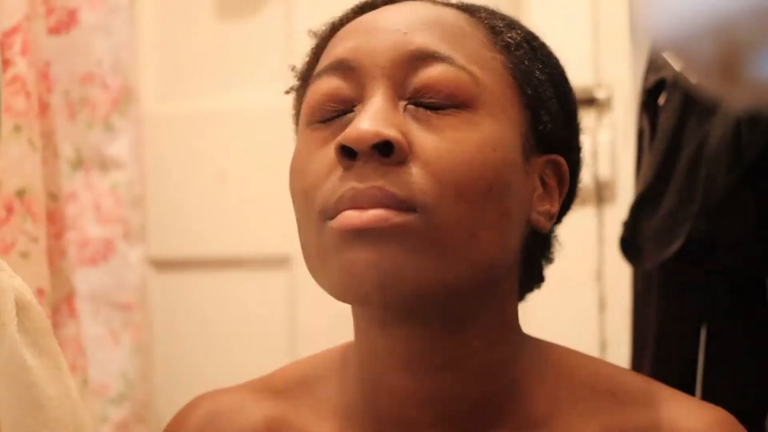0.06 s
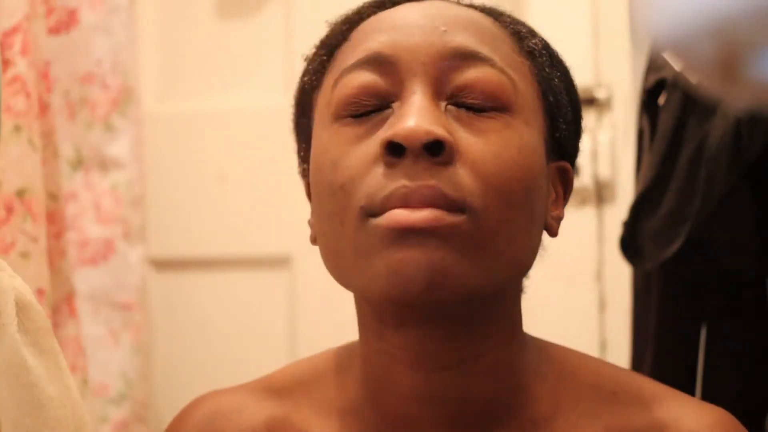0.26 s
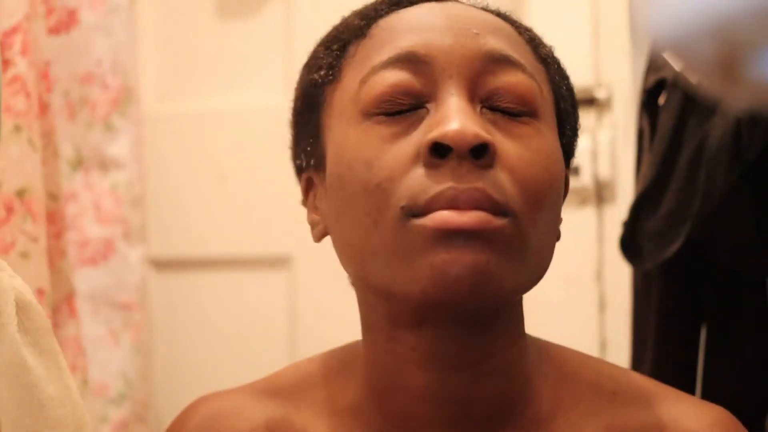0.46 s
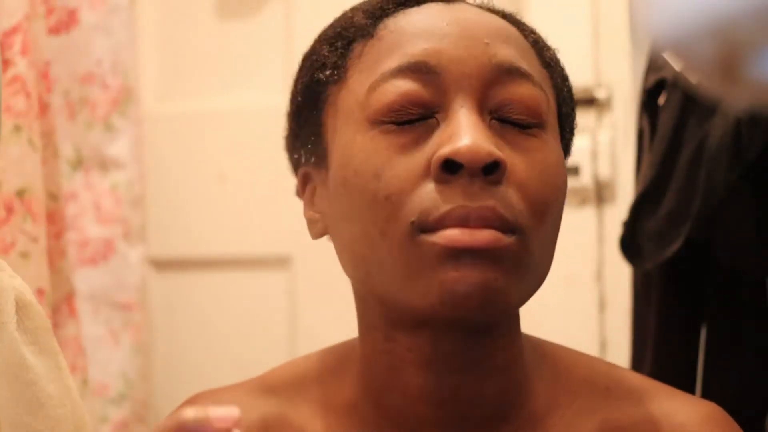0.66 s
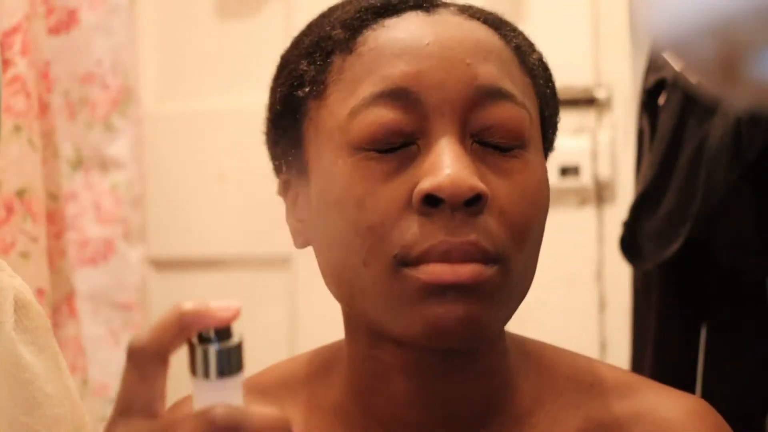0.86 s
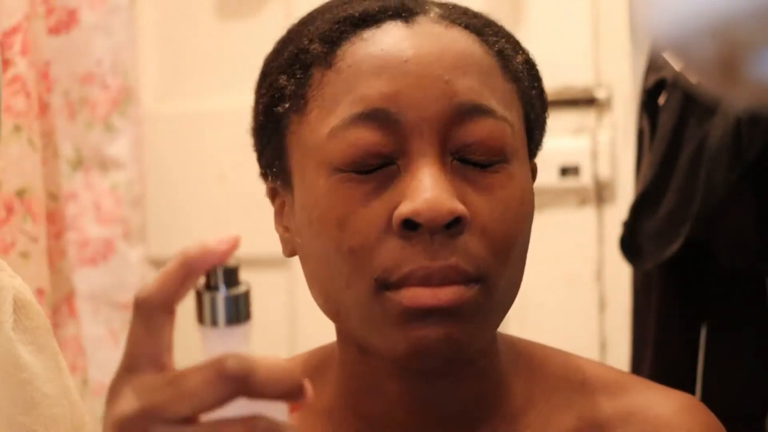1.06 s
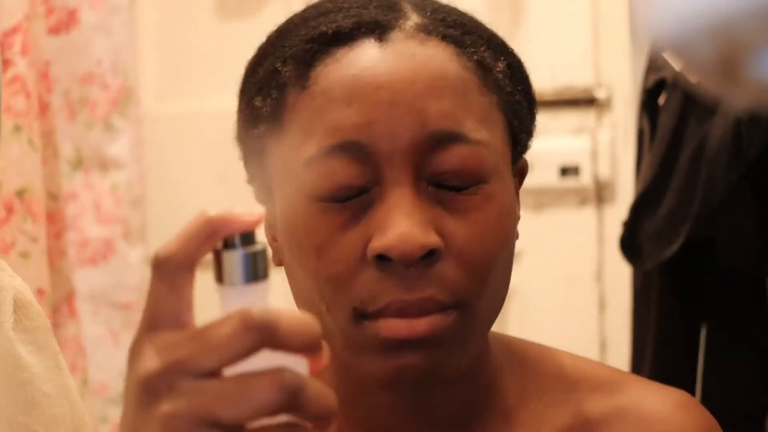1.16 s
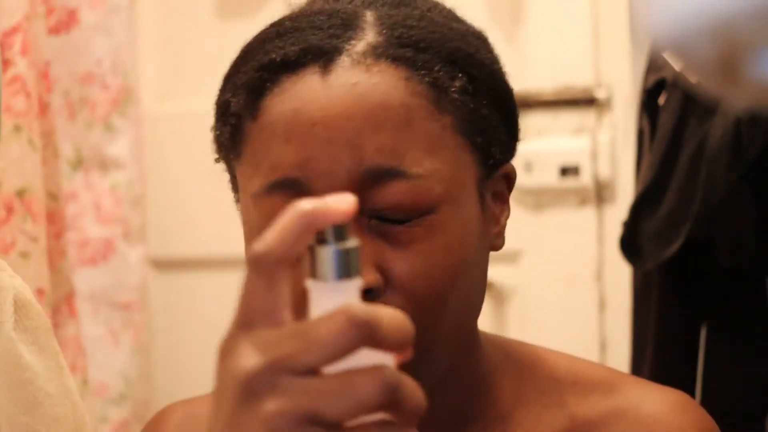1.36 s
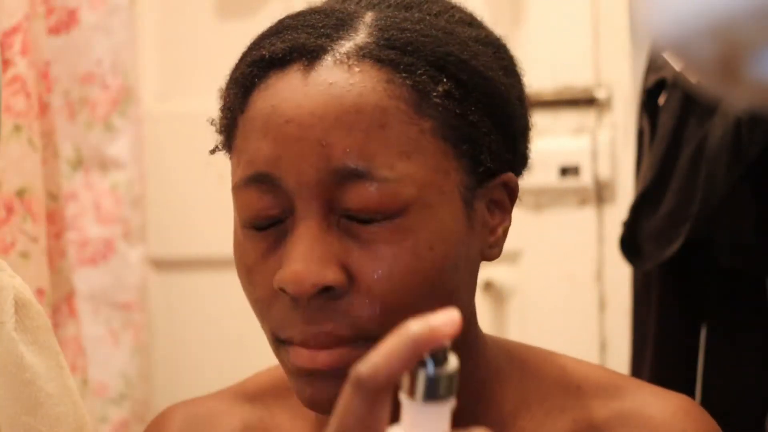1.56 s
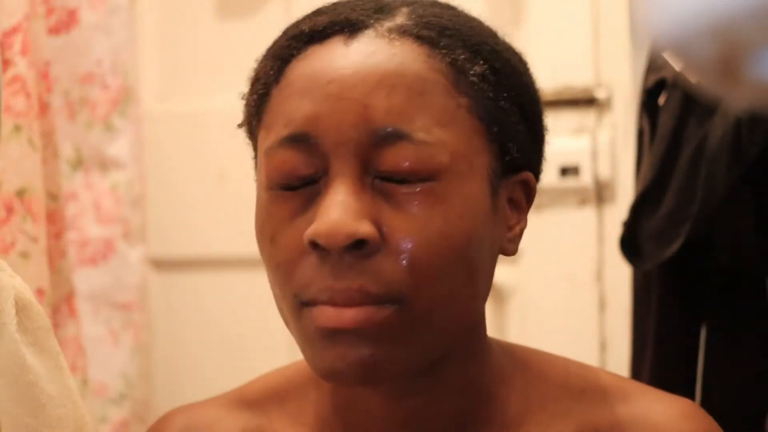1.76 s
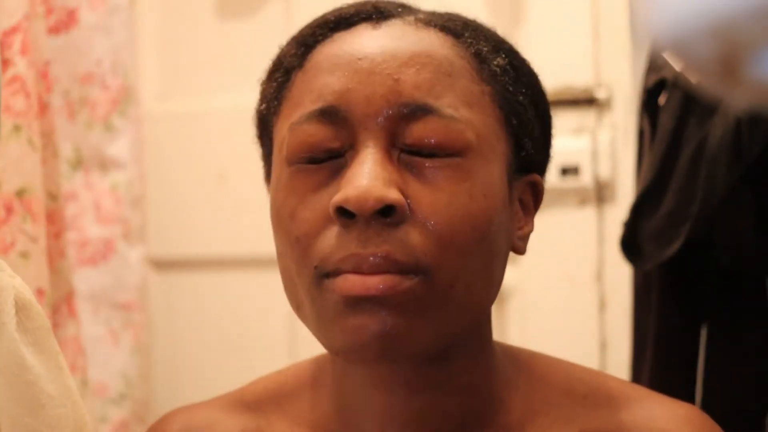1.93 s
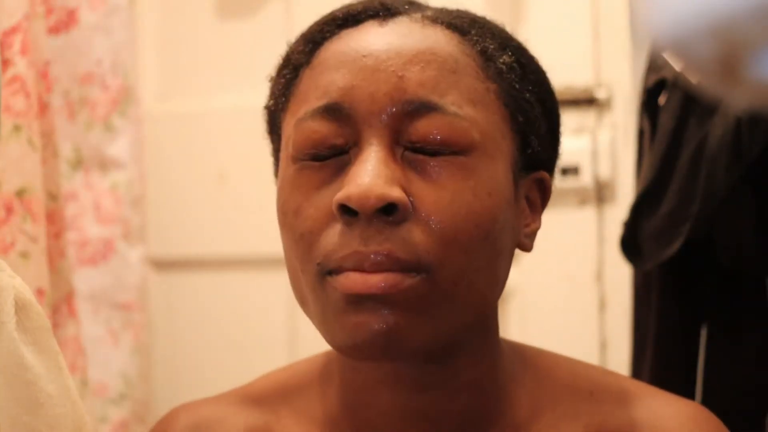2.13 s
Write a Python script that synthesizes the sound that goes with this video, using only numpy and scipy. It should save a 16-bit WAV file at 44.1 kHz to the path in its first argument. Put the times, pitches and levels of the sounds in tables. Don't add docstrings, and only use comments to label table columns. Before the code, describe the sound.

Close up in a small reflective bathroom, a finger works a mist sprayer: creaky plastic rub, crisp short hiss, head knocking back, thin sucking whistle, repeated about four times a second over quiet room air.

```python
import sys
import numpy as np
from scipy import signal
from scipy.fft import rfft, irfft
from scipy.io import wavfile
from scipy.ndimage import uniform_filter1d

SR = 44100
rng = np.random.default_rng(int(sys.argv[2]) if len(sys.argv) > 2 else 0)


def transcribe(signal):
    frames = np.atleast_2d(signal).T
    limited = np.clip(frames, -1, 1)
    pcm = np.round(limited * 32767).astype(np.int16)
    wavfile.write(sys.argv[1], SR, pcm)


def attenuation_scalar(level_db):
    decades = np.asarray(level_db, float) / 20
    return 10 ** decades


N = 96755

OPENS = [
    .0778,
    .3995,
    .6492,
    .9202,
    1.1986,
    1.4665,
    1.725,
    1.9888,
    2.185,
]


def time():
    return np.arange(N) / SR


def rms_one(x):
    return x / np.sqrt(np.mean(x ** 2) + 1e-20)


def cut(x, hz, kind):
    return signal.sosfilt(signal.butter(2, hz, kind, fs=SR, output="sos"), x)


def band(x, hz, width):
    return rms_one(cut(x, [hz - width / 2, hz + width / 2], "band"))


def colour(x, points):
    hz, db = np.transpose(points)
    f = np.arange(N // 2 + 1) * SR / N + 1
    gain = attenuation_scalar(np.interp(np.log(f), np.log(hz), db))
    return rms_one(irfft(rfft(x) * gain, N))


def drift(rate):
    r = np.exp(-2 * np.pi * rate / SR)
    settle = 9000
    slow = signal.lfilter([1], [1, -2 * r, r * r], rng.standard_normal(N + settle))
    return rms_one(slow[settle:])


def ring(clicks, hz, t60):
    r = attenuation_scalar(-60 / (t60 * SR))
    w = 2 * np.pi * hz / SR
    return signal.lfilter([0, np.sin(w)], [1, -2 * r * np.cos(w), r * r], clicks + 1e-18)


def burst(s, rise, fall):
    out = np.zeros(N)
    i, j = max(int((s - rise) * SR), 0), int((s + 9 * fall) * SR)
    t = time()[i:j] - s
    out[i:j] = np.where(t < 0, np.clip(1 + t / rise, 0, 1), np.exp(-np.maximum(t, 0) / fall))
    return out


def grains(per_s, spread):
    size = attenuation_scalar(spread * np.minimum(rng.exponential(1, N), 4)) * rng.choice([-1, 1], N)
    return rms_one(size * (rng.random(N) < per_s / SR))


def jet():
    # length in s, hiss in dB, pop peak in dB, swell after opening in dB, sag in dB per s.
    sprays = [
        (0.13, -41.5, -43, 2, -3),
        (0.099, -43, -41, 5.5, 23),
        (0.13, -42, -30.5, 4.5, 27),
        (0.12, -41.5, -28, 7, 39),
        (0.13, -40.5, -29, 5, 39),
        (0.1, -42, -28, 6.5, 35),
        (0.099, -42, -26, 6.5, 34),
        (0.072, -42.5, -32, 7.5, 25),
        (.1, -50, -55, 21, 30),
    ]
    # frequency in Hz, level in dB per Hz.
    mist_spectrum = [(710, -16), (1200, -12.5), (2980, 0.5), (3290, -2), (8000, -3), (9230, -5.5),
                     (14900, -5), (16000, 0.5), (16500, -71)]
    # frequency in Hz, width in Hz, level in dB.
    nozzle = [(6160, 2000, -9.5), (8630, 2200, -4.5)]
    # frequency in Hz, level in dB.
    pop_rings = [(1700, -9.5), (3500, -43), (6000, 2), (9400, 3), (12000, -13), (15500, -14)]
    attack_s, swell_s, release_db_per_s = 0.00072, 0.038, 419
    surge_db, surge_s = 3, 0.012
    alike = 0.18

    level, start, pops = np.zeros((3, N))
    for s, (length, db, pop_db, swell_db, sag_db) in zip(OPENS, sprays):
        t = time() - s
        swell = swell_db * np.clip(t / swell_s, 0, 1) + surge_db * np.exp(-np.abs(t) / surge_s)
        fall = sag_db * t + release_db_per_s * np.maximum(t - length, 0)
        level += np.clip(t / attack_s, 0, 1) * attenuation_scalar(np.minimum(db + swell - fall, 0))
        start += attenuation_scalar(db) * burst(s + attack_s, attack_s, 0.035)
        pops[int(s * SR)] = attenuation_scalar(pop_db)

    white = rng.standard_normal((3, N))
    flicker = attenuation_scalar(1.17 * drift(37))
    hiss = []
    for w in white:
        whistle = sum(attenuation_scalar(db) * band(w, hz, width) for hz, width, db in nozzle)
        hiss.append(level * colour(w, mist_spectrum) + start * whistle)
    hiss = signal.sosfilt(signal.cheby2(12, 40, 15950, fs=SR, output="sos"), np.array(hiss))

    top = cut(hiss, 10600, "high")
    unformed = sum(burst(s, attack_s, 0.035) for s in OPENS)
    hiss = (hiss - top * (1 - attenuation_scalar(-2.5)) * unformed) * flicker

    pop = sum(attenuation_scalar(db) * ring(pops, hz, 0.0037) for hz, db in pop_rings)
    near = np.sqrt(alike) * hiss[0] + cut(pop, 900, "high")
    return near, np.sqrt(1 - alike) * hiss[1:]


def bottle():
    # hardest rub in s, level in dB, rise in s, fall in s, hollow thud in dB.
    rubs = [
        (0.113, -44, 0.022, 0.055, -0.5),
        (0.398, -34, 0.0011, 0.012, -2),
        (0.69, -38, 0.039, 0.025, 1.5),
        (0.959, -38.5, 0.032, 0.059, -3.5),
        (1.237, -37, 0.031, 0.031, -1.5),
        (1.503, -39, 0.032, 0.032, 3.5),
        (1.763, -36.5, 0.035, 0.036, -6.5),
        (2.032, -39, 0.031, 0.038, 2),
        (2.2, -43, 0.018, 0.051, -4),
    ]
    # time in s, level in dB, ringing-on in s.
    knocks = [(0.237, -42, 0.029), (.248, -46, 0.055), (0.529, -38.5, 0.022), (0.774, -46.5, 0.027),
              (0.798, -41, 0.018), (1.078, -37.5, 0.02), (1.1, -56, 0.012), (1.356, -37, 0.0061),
              (1.363, -45, .012), (1.386, -62, 0.011), (1.615, -39.5, 0.0082), (1.621, -43.5, 0.0086),
              (1.886, -39.5, 0.012), (1.912, -45.5, 0.018), (1.942, -57, 0.014), (1.968, -75, 0.008),
              (2.134, -40, 0.0056), (2.148, -50.5, 0.0093)]
    # time in s, peak in dB.
    catch_times = [(0.0953, -31.5), (0.1031, -28.5), (0.1116, -25), (0.245, -32), (0.3986, -32),
                   (0.405, -26), (0.5302, -32), (.659, -44), (0.6785, -31), (0.6961, -29), (0.9343, -29),
                   (0.9437, -24), (0.955, -26.5), (0.959, -23), (1.212, -27.5), (1.2234, -35),
                   (1.236, -27.5), (1.25, -24), (1.258, -23), (1.479, -29), (1.489, -34), (1.497, -21.5),
                   (1.5032, -26.5), (1.508, -35.5), (1.522, -30), (1.737, -27.5), (1.747, -28),
                   (1.759, -22), (1.764, -37), (1.779, -45), (1.887, -37), (2.0011, -27), (2.009, -26.5),
                   (2.02, -26), (2.0367, -23)]
    # mode in Hz, t60 in s, level rubbed in dB, level knocked in dB.
    modes = [(248, 0.041, -29, -22), (328, 0.14, -8, -7), (372, 0.051, -10, -7.5),
             (410.8, 0.037, -4.5, -6.5), (462, 0.019, -11.5, -13), (546, 0.024, -10.5, -18.5),
             (736, 0.005, -16, -7.5), (909, 0.01, -7, -8.5), (1089, 0.017, -11.5, -8),
             (1506, 0.017, -12, -11), (1874, 0.0067, -13, -11), (2051, 0.011, 1, -19),
             (2558, 0.0094, 0.5, -15), (2885, 0.023, -4, -12.5)]
    low_top_hz, low_lead_cycles = 600, 2.9
    knock_late_s, knock_rise_cycles = 0.0015, 6.5

    slips, rattle = grains(1800, 2.5), grains(1500, 3.8)
    catches, hits = np.zeros((2, N))
    for s, db in catch_times:
        catches[int(s * SR)] = -attenuation_scalar(db - 7)
    for s, db, _ in knocks:
        hits[int(s * SR)] = attenuation_scalar(db + 4.5)
    press = sum(attenuation_scalar(-43) * burst(s, 0.012, 0.0084) for s in np.delete(OPENS, 1))
    linger = sum(attenuation_scalar(db - 18.5) * burst(s, rise, 0.091) for s, db, rise, *_ in rubs)
    sliding = 1 - sum((time() > s - 0.03) * (time() < s) for s in OPENS)

    out = 0
    for hz, t60, rub_db, knock_db in modes:
        low = hz < low_top_hz
        rub = linger
        for s, db, rise, fall, thud_db in rubs:
            lead = low_lead_cycles / hz * (rise > 0.01)
            rub = rub + attenuation_scalar(db + thud_db * low) * burst(s, rise + lead, fall / 2)
        rub = rub * (1 if low else sliding)
        knock = press * low
        for s, db, fall in knocks:
            rise = knock_late_s + knock_rise_cycles / hz
            knock = knock + attenuation_scalar(db) * burst(s + knock_late_s, rise, fall / 2)
        force = attenuation_scalar(rub_db) * rub * slips + attenuation_scalar(knock_db) * knock * rattle
        force = force / np.sqrt(t60 * SR / 10)
        impact = (attenuation_scalar(rub_db) * catches + attenuation_scalar(knock_db) * hits) * attenuation_scalar(-0.5 * low)
        scatter = attenuation_scalar(3 * rng.standard_normal(N))
        out = out + ring(scatter * (force + impact), hz, t60)
    return signal.sosfiltfilt(signal.butter(5, 282.4, "high", fs=SR, output="sos"), out)


def refill():
    # time in s, hiss in dB, length in s.
    refills = [
        (.001, -47, 0.012),
        (0.292, -46.5, .012),
        (0.363, -47, 0.013),
        (0.577, -48.5, 0.017),
        (0.849, -48.5, 0.018),
        (1.126, -47, 0.01),
        (1.402, -48, 0.016),
        (1.661, -48.5, 0.018),
        (1.939, -48.5, 0.019),
    ]
    # frequency in Hz, width in Hz, level in dB.
    suck_rings = [(4360, 7100, -2), (6040, 1800, -16.5), (8570, 600, -12), (11200, 5600, -13.5)]
    # time in s, level in dB, frequency in Hz, hold in s.
    squeaks = [(.006, -47, 2040, .014), (.022, -56, 2030, .03), (.294, -54, 2050, .004),
               (.302, -50, 2060, .007), (.32, -59, 2000, .015), (.362, -50, 1800, .005),
               (.59, -56, 2040, .02), (.862, -53, 2535, .01), (1.134, -47, 2037, .012),
               (1.15, -55, 2050, .02), (1.416, -49, 1960, .01), (1.665, -57, 2040, .008),
               (1.677, -50, 2000, .008), (1.673, -52, 2950, .012), (2.122, -54, 2050, .008),
               (1.70, -59, 2000, .01), (1.942, -53, 2440, .008), (1.92, -52, 1250, .006),
               (1.963, -52, 1000, .008)]
    width_hz, overtone, overtone_db = 95, 1.357, -9
    rise_s, fall_s, sag_hz_per_s = 0.00072, 0.0015, 1900

    white = rng.standard_normal((2, N))
    wobble = 39.22 * drift(58.6)
    out = sum(attenuation_scalar(db) * band(white[0], hz, width) for hz, width, db in suck_rings)
    out = out * sum(attenuation_scalar(db) * burst(s, 0.00073, length) for s, db, length in refills)
    for s, db, hz, hold in squeaks:
        t = time() - s
        pitch = hz + wobble - sag_hz_per_s * np.clip(t, 0, 0.05)
        clear = 0.75 * np.sin(2 * np.pi * np.cumsum(pitch) / SR)
        breath = 0.5 * band(white[1], hz, width_hz)
        breath = breath + attenuation_scalar(overtone_db) * band(white[1], overtone * hz, 4 * width_hz)
        shape = np.clip(t / rise_s, 0, 1) * np.exp(-np.maximum(t - hold, 0) / fall_s)
        out = out + attenuation_scalar(db) * shape * (clear + breath)
    return out


def room(x):
    side_lowest_hz, split_hz = 400, 3400
    t = np.arange(SR // 2) / SR
    mid, left, right = rng.standard_normal((3, len(t)))
    sides = cut(cut(np.array([left, right]), side_lowest_hz, "high"), side_lowest_hz, "high")
    echo = attenuation_scalar(-2) * cut(mid, 750, "low") + sides
    low = cut(echo, split_hz, "low")
    late = low * attenuation_scalar(-60 * t / 0.43) + (echo - low) * attenuation_scalar(-60 * t / 0.13)
    early = echo * attenuation_scalar(9.5 - 60 * t / 0.12)
    echo = (late + early) * (t > 0.0024)
    return signal.fftconvolve(x, rms_one(echo) / np.sqrt(len(t)), axes=1)[:, :N]


def moving_room(x):
    poses = 8
    pose = time() * SR / N * (poses - 1)
    return sum(room(x * np.cos(np.pi / 2 * np.clip(pose - k, -1, 1))) for k in range(poses))


def air():
    # frequency in Hz, level in dB per Hz.
    air_spectrum = [(20, -43), (80, -11), (215, -13.5), (330, -6), (700, -14.5), (3000, -23.5),
                    (4500, -25.5), (15800, -32), (16500, -63)]
    alike = 0.72
    mid, side = (colour(w, air_spectrum) for w in rng.standard_normal((2, N)))
    difference = cut(side, 60.3, "high") * [[1], [-1]]
    return attenuation_scalar(-56.5) * (np.sqrt(alike) * mid + np.sqrt(1 - alike) * difference)


def to_sides(x):
    lead_samples, left_db = 1.45, -0.97
    lead = np.exp(2j * np.pi * np.arange(N // 2 + 1) / N * lead_samples)
    return np.array([attenuation_scalar(left_db) * irfft(rfft(x) * lead, N), x])


def scene():
    near, spread = jet()
    body = to_sides(bottle() + refill())
    mist = to_sides(near) + spread
    echoes = moving_room(mist + attenuation_scalar(-4) * body)
    return mist + body + attenuation_scalar(0.5) * echoes + air()


def top_cut(x):
    return signal.sosfilt(signal.butter(12, 16810, fs=SR, output="sos"), x)


def record(dry):
    dry = signal.sosfilt(signal.cheby2(12, 60, 16900, fs=SR, output="sos"), dry)
    ahead = sum((time() > s - 0.015) * (time() < s - 0.001) for s in OPENS)
    duck = (1 - attenuation_scalar(-11)) * uniform_filter1d(ahead * 1.0, size=40)
    mix = dry - cut(dry, 5000, "high") * duck
    return top_cut(mix)


dry = scene()
out = record(dry)
transcribe(out)
```